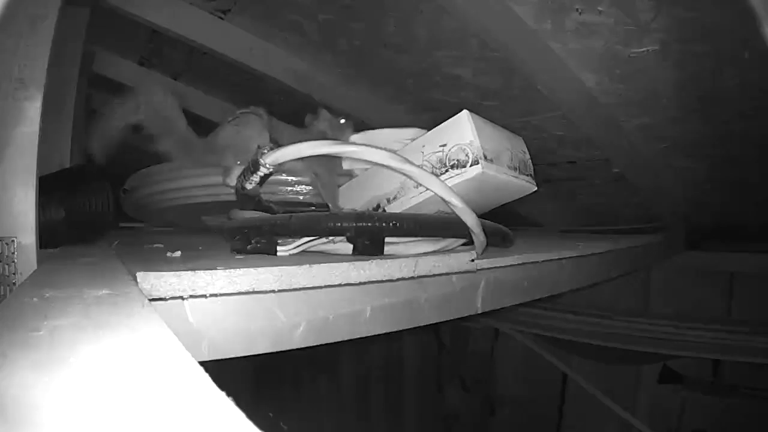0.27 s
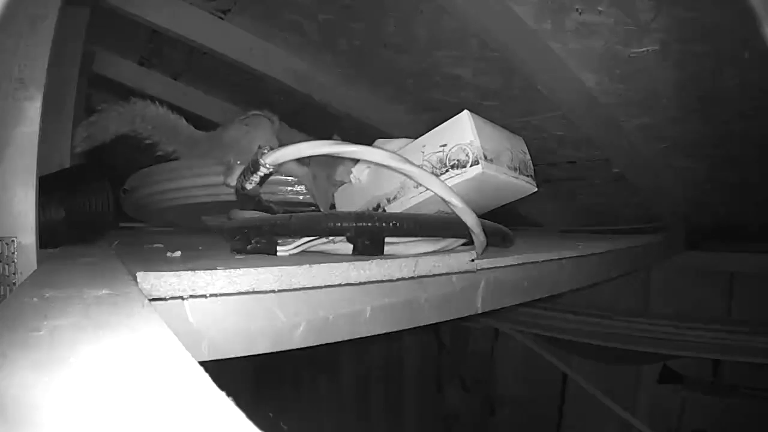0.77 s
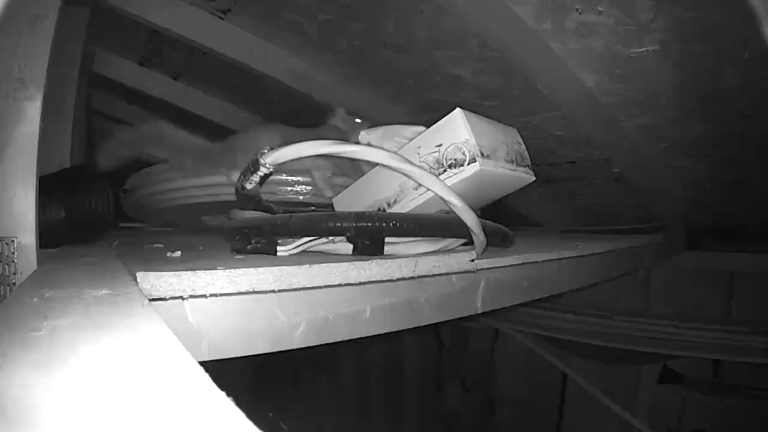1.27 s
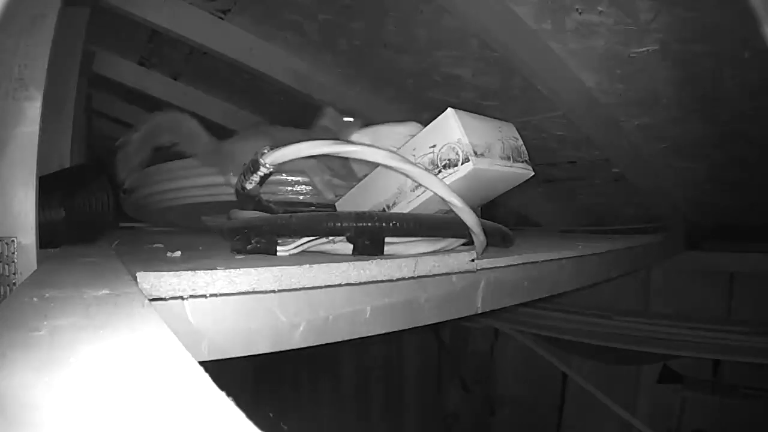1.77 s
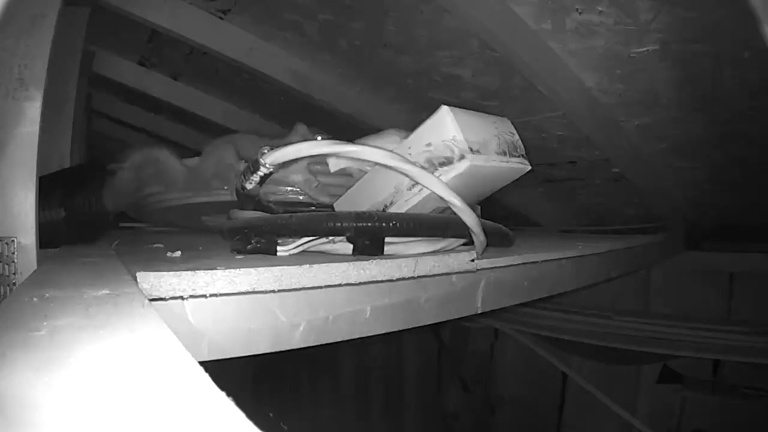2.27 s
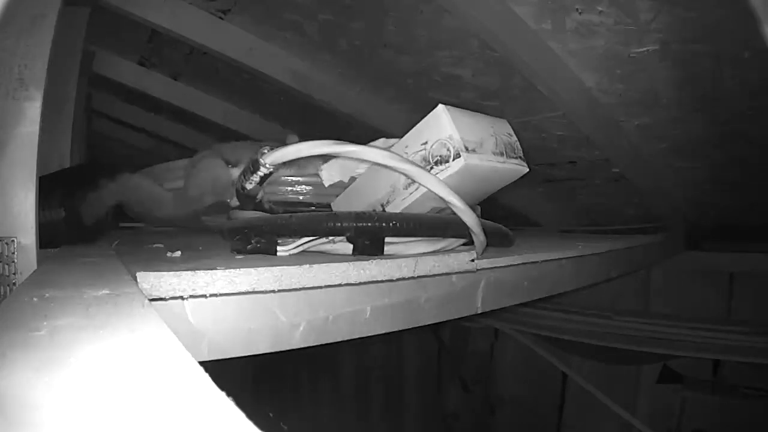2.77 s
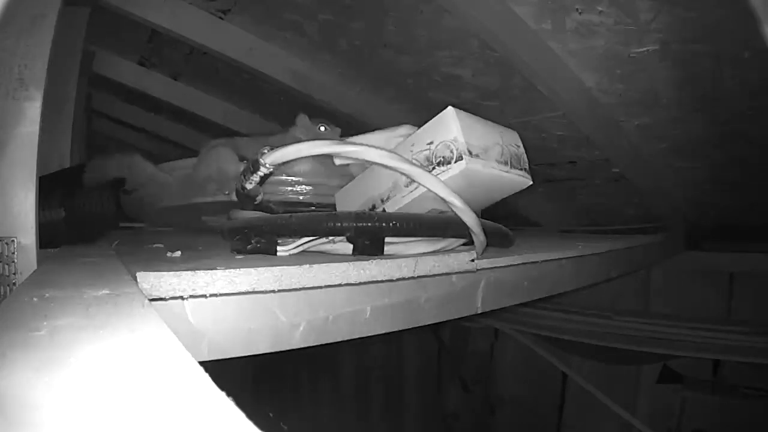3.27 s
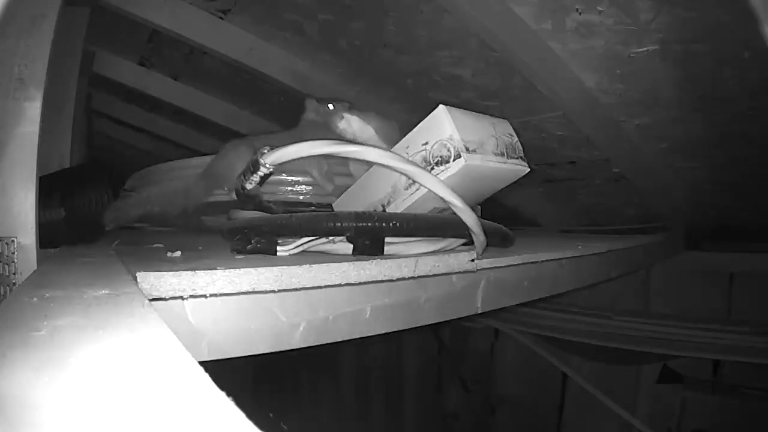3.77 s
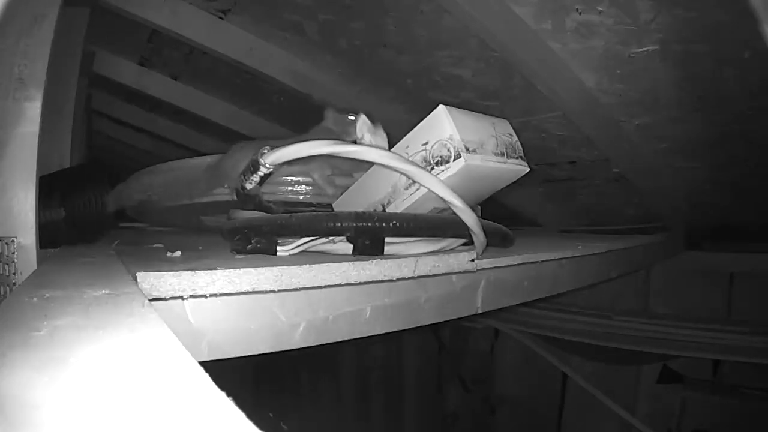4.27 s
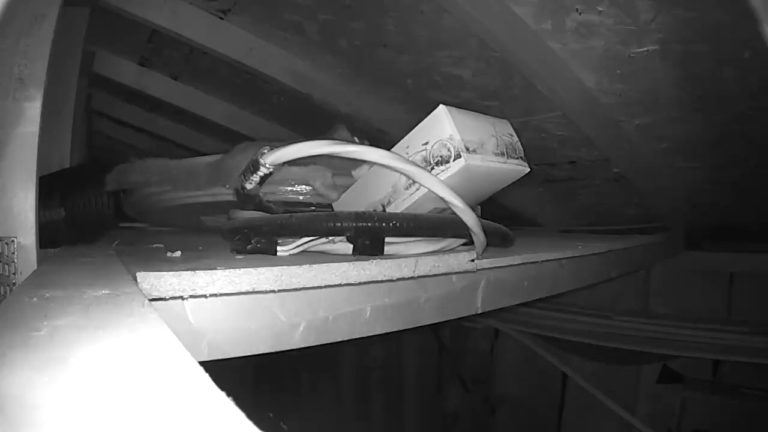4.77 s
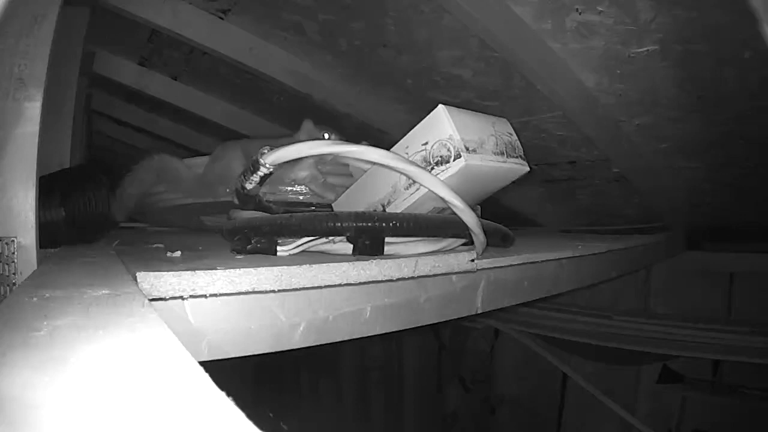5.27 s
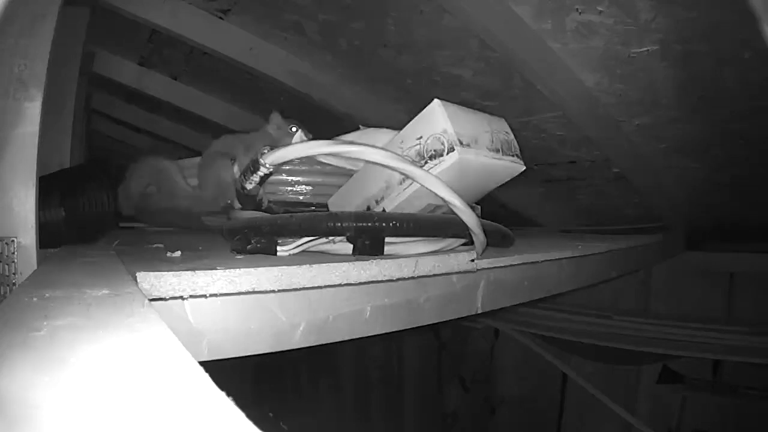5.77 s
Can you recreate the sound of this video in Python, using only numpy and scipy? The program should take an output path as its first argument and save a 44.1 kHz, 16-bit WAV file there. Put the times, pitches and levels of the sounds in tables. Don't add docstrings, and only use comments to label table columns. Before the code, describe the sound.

In a quiet attic, a squirrel-like rodent pulls tissue from a box. A sharp crack comes almost at once, then short crisp rustles, snaps and claw ticks with small pauses. Midway the rasping grows denser and the board knocks; late in the clip come the heaviest wooden thumps. A cheap, dull-topped camera microphone adds low rumble, hiss and a very faint high whine.

```python
import sys
import numpy as np
from scipy import signal
from scipy.fft import rfft, irfft, next_fast_len
from scipy.io import wavfile

SR = 44100
rng = np.random.default_rng(int(sys.argv[2]) if len(sys.argv) > 2 else 0)


def log_audio(samples):
    frames = np.atleast_2d(samples).T
    limited = np.clip(frames, -1, 1)
    pcm = np.round(limited * 32767).astype(np.int16)
    wavfile.write(sys.argv[1], SR, pcm)


def boost(x):
    u = np.asarray(x, float) / 20
    return 10 ** u


N = 265482

# t/s, board creak level/dB, rumble level/dB, board flexing level/dB
LOW_SWELLS = [(.05, -51.5, -60.5, -73), (.54, -68, -64, -62), (0.879, -64, -64.5, -65),
              (1.2, -72, -76, -63.5), (1.56, -53, -69, -62), (2.11, -52, -53.5, -64),
              (2.44, -57, -68, -58), (2.78, -56.5, -59.5, -57), (3.07, -70, -72, -62),
              (3.34, -54, -53, -65), (3.88, -58, -71, -63.5), (4.161, -56, -68.5, -57),
              (4.46, -58, -70, -52), (5.12, -63, -59.5, -57.5), (5.34, -46, -53.5, -50.5),
              (5.46, -55, -63.5, -52.5), (5.82, -53.5, -56, -52.5), (5.95, -50, -59, -51)]
# f/Hz, level per Hz/dB
RUMBLE_SPECTRUM = [(35, -18), (55, -5), (75, -9.5), (105, -4.5), (166, -8), (200, -22.5), (300, -24.5)]
# f/Hz, level per Hz/dB
FLEX_SPECTRUM = [(8, -16), (25, 8.5), (45, -2.5), (70, -32.5)]
# f/Hz, level per Hz/dB
HISS_SPECTRUM = [(120, -14), (160, -8.5), (250, -5), (350, -6.5), (750, -14.5), (1800, -21), (3700, -20),
                 (5500, -21), (6900, -22.5), (7700, -23.5)]
# start t/s, hold t/s, rustle level/dB, box wall share level/dB
TISSUE_TUGS = [(.02, 0.12, -55.5, -0.5), (0.121, 0.11, -52.5, 7), (0.29, 0.12, -58, 0.5),
               (.385, 0.15, -57, -7), (0.71, .04, -60, 0), (0.769, 0.037, -55, 7.5), (0.956, 0.13, -56, -4),
               (1.359, 0.12, -55.5, 4), (1.488, 0.054, -51, 2.5), (1.62, 0.023, -60.5, -2),
               (1.715, 0.037, -54, 3), (1.921, 0.081, -56, 4), (2.078, 0.08, -57, 7.5),
               (2.28, .07, -62, -6), (2.382, 0.046, -52, -2), (2.68, 0.082, -55, 0), (2.98, 0.013, -53, -4),
               (3.261, .03, -53.5, -1.5), (3.353, 0.18, -53.5, -2), (3.559, 0.42, -54, -1.5),
               (3.852, 0.11, -54, 2), (4.124, 0.087, -55, 4.5), (4.19, 0.13, -51, 2.5),
               (4.375, 0.2, -50.5, -3.5), (4.87, 0.068, -53.5, -9), (5.105, 0.038, -59.5, -4),
               (5.195, 0.024, -53, 0), (5.281, 0.1, -50.5, 3), (5.731, 0.15, -50, -5.5),
               (5.933, 0.017, -53.5, 4)]
# start t/s, rustle level/dB
HEAP_STIRS = [
    (2.5, -64),
    (2.835, -59),
    (3.19, -65),
    (4.78, -61),
    (5.02, -65),
    (5.268, -51),
    (5.44, -62.5),
    (5.68, -61),
    (1.87, -65),
]
# f/Hz, level per Hz/dB
TISSUE_SPECTRUM = [(600, -14.5), (900, -19), (1340, -13), (1720, -11.5), (2180, -9), (2800, -8.5),
                   (3200, -8), (3600, -4.5), (4200, -6), (5250, -11), (6300, -11.5), (7000, -17.5),
                   (7700, -14.5)]
# f/Hz, width f/Hz, level/dB
WALL_TONES = [
    (1020, 420, -10),
    (1260, 29, 5.5),
    (1402, 62, 7.5),
    (2060, 190, 3),
]
# f/Hz, width f/Hz, level/dB, extra ring-on level/dB
SNAP_PARTS = [
    (1166, 516, -1, 8),
    (2073, 1160, 2, 4.5),
    (5830, 7700, -1, -0.5),
    (3564, 1680, 0, 3),
]
# t/s, peak level/dB, fold relative level/dB, crisp edge relative level/dB
FOLD_RASPS = [(0.0284, -52, -10, -12), (.3294, -52.5, -11.5, -8), (0.7086, -50, -11, -8),
              (.726, -51, -4, -25), (1.371, -43.5, -6.5, -3), (1.627, -43.5, -15, 2),
              (1.7028, -43, -11.5, -15), (1.7384, -52, -10, -16), (1.952, -48, -11, -14),
              (2.073, -51, -5.5, 2.5), (2.3092, -60, -4, -15), (2.6683, -51.5, -4.5, -21),
              (3.3628, -42.5, -5.5, -4.5), (3.424, -45.5, -8, -23), (3.4865, -39, -8, -17),
              (3.749, -47.5, -3, -2), (3.8686, -43, -5.5, -14), (3.933, -46, -16, -11),
              (3.9766, -56, -3, -8), (4.1245, -45, -17, -18), (4.1924, -41.5, -7.5, -7),
              (4.2594, -52, -10, -20), (4.4147, -39.5, -8.5, -7.5), (4.482, -42, -21, -18),
              (4.55, -48.5, -5, -2), (5.1875, -46.5, -7.5, -6), (5.3027, -38, -3, -11.5),
              (5.3725, -39.5, -6, -16), (5.7454, -55, -3, -13), (5.869, -43, -4.5, -9)]
# t/s, peak level/dB, box wall relative level/dB, time to fall 60 dB t/s
CLAW_SCRAPES = [
    (0.7773, -53, 6, 0.039),
    (1.4334, -52.5, 9.5, 0.076),
    (2.0194, -53.5, -5, 0.08),
    (2.1766, -54.5, -2, 0.082),
    (2.7544, -52.5, 1, 0.067),
    (3.2806, -46.5, -2, 0.095),
    (4.9875, -52.5, -0.5, 0.085),
    (5.2809, -47.5, 1.5, 0.084),
]
# t/s, peak level/dB, hardness per octave above level/dB,
# weight per octave below level/dB, time for contact to fall 60 dB t/s
BOARD_KNOCKS = [(0.116, -35.5, 2, -18.5, 0.011), (0.964, -52.5, 6.5, -4, 0.013),
                (1.43, -44.5, 11.5, -1, 0.026), (1.994, -45, -2, -3.5, 0.047), (2.019, -42, 3, 1, 0.035),
                (2.175, -47, 0, 3, 0.047), (2.377, -52.5, 8, 3.5, 0.025), (2.512, -55, 1, 8.5, 0.028),
                (2.671, -45, 1, -2, 0.032), (2.754, -48, 7.5, 7.5, 0.061), (2.978, -47, 9.5, -6, 0.026),
                (3.28, -32.5, -0.5, -5.5, 0.031), (3.488, -51, 9.5, -4, 0.068), (4.307, -43.5, 3, 5, 0.027),
                (4.473, -53, 4, -6, 0.028), (4.992, -42, -5, -2.5, 0.023), (5.096, -53.5, -6, 0.5, 0.048),
                (5.258, -43.5, 0.5, -2.5, 0.078), (5.302, -30.5, -1, -11, 0.031),
                (5.373, -24.5, -2.5, -2.5, 0.042), (5.757, -45.5, -4, 0, 0.019),
                (5.777, -32.5, -4.5, 1, 0.015), (5.869, -39, -2, 2, 0.019), (5.93, -27, -1.5, -3, 0.04)]
# f/Hz, level/dB, time to fall 60 dB t/s
BOARD_TONES = [(127, -7.5, 0.015), (190, -6.5, 0.051), (223, -8.5, 0.027), (278, -4, .045),
               (365, -7.5, 0.049), (470, -8, 0.024), (480.3, -3, 0.056), (583, -7, 0.041),
               (681, -5.5, 0.025), (856, -9.5, 0.031), (1030, -13, 0.027), (1375, -9, 0.022)]
# t/s, peak level/dB, pitch f/Hz
SHORT_RINGS = [(.1186, -21, 3030), (.1182, -29, 3300), (.7795, -42, 2250), (1.4237, -29.5, 5200),
               (2.878, -42.5, 4700), (2.9743, -43, 1180), (2.975, -44, 690), (4.8648, -44, 2200),
               (5.2512, -29, 4300), (5.378, -39, 210), (5.781, -42, 420), (.9285, -42, 2000),
               (.959, -43, 6200), (5.305, -29, 2600), (5.8005, -37, 4900), (2.755, -49, 1800),
               (1.4235, -43, 8100)]
# t/s, peak level/dB, then relative level/dB of box wall, fold and crisp edge
TISSUE_SNAPS = [(.374, -36.5, -13.5, -12.5, -10), (0.526, -51, -7, -3, -18), (0.9288, -37, -22, -7.5, -13),
                (.9594, -41.5, -27, -2, 5), (1.01, -55, -21, -6, -15), (1.3323, -43, -13, -12, -29),
                (1.4241, -33.5, -13, -33, -42), (1.4903, -39.5, -4.5, -20, -23),
                (2.376, -43.5, -15.5, -4, 3), (2.8804, -51, -22, -20, 0), (2.9739, -41.5, 11.5, -41, -37),
                (4.865, -45.5, -15, -4.5, -15), (5.2525, -39, -22, -24, -31), (5.8022, -37, -20, -14, -22),
                (5.9322, -42.5, 9, 5, -13)]

# level/dB, time to fall 60 dB t/s
SNAP_ECHO, KNOCK_ECHO = (-25, 0.35), (-14, 0.39)


def rms_one(x):
    return x / np.sqrt(np.mean(x ** 2) + 1e-20)


def drift(rate_hz):
    r = np.exp(-2 * np.pi * rate_hz / SR)
    slow = signal.lfilter([1], [1, -2 * r, r * r], rng.standard_normal(N + SR))
    return rms_one(slow[SR:])


def colour(x, spectrum):
    hz, db = np.transpose(spectrum)
    size = next_fast_len(N)
    grid_hz = np.maximum(np.arange(size // 2 + 1) * SR / size, 1)
    gain = boost(np.interp(np.log(grid_hz), np.log(hz), db, -90, -90))
    return rms_one(irfft(rfft(x, size) * gain, size)[:N])


def resonate(x, hz, width_hz):
    r = np.exp(-np.pi * width_hz / SR)
    feed = np.array([1, 0, -1]) * (1 - r * r) / 2
    return signal.lfilter(feed, [1, -2 * r * np.cos(2 * np.pi * hz / SR), r * r], x + 1e-18)


def grains(per_s, spread_db):
    sizes = boost(spread_db * np.minimum(rng.exponential(1, N), 4))
    signed = sizes * rng.choice([-1, 1], N)
    return rms_one(signed * (rng.random(N) < per_s / SR))


def bursts(times, peak_db, t60, rise_share, echo):
    out = np.zeros(N)
    echo_db, echo_t60 = echo
    for s, db, fade in zip(times, peak_db, np.maximum(t60, 0.004)):
        rise = max(rise_share, 0.01) * fade
        start = int((s - 0.0015) * SR)
        t = np.arange(min(SR // 2, N - start)) / SR
        since_peak = np.maximum(t - rise, 0)
        dying = boost(-60 * since_peak / fade) + boost(echo_db - 60 * since_peak / echo_t60)
        out[start:start + len(t)] += boost(db) * dying * np.minimum(t / rise, 1) ** 2
    return out


def cracking(rows, gain_db, rise_share, echo):
    s, peak_db, *shares, t60 = np.transpose(rows)
    cracks, out = grains(16000, spread_db=1.5), 0
    signs = (1, -1, -1, 1)
    for (hz, width, db, ring_db), share_db, sign in zip(SNAP_PARTS, shares + [0], signs):
        part_echo = (echo[0] + ring_db, echo[1])
        struck = cracks * bursts(s, peak_db + share_db + db + gain_db, t60, rise_share, part_echo)
        ringing = resonate(resonate(struck, hz, width), hz, width)
        out = out + sign * ringing * np.sqrt(SR / width) / 3
    return out


def swelling():
    lengths_s = (0.073, 0.059, 0.052)
    at_rest_db = (-68, -62.5, -65.5)
    t = np.arange(0, N, 32) / SR
    s, *peaks = np.transpose(LOW_SWELLS)[:, :, None]
    levels = []
    for db, length, rest_db in zip(peaks, lengths_s, at_rest_db):
        swells = boost(db) * np.exp(-0.5 * ((t - s) / length) ** 2)
        level_db = 20 * np.log10(boost(rest_db) + swells.sum(axis=0))
        levels.append(np.interp(np.arange(N) / SR, t, level_db))
    return levels


def background(rumble_db, flex_db):
    rumble = boost(rumble_db) * colour(rng.standard_normal(N), RUMBLE_SPECTRUM)
    flex = boost(flex_db) * colour(rng.standard_normal(N), FLEX_SPECTRUM)
    hiss = boost(-64.5) * colour(rng.standard_normal(N), HISS_SPECTRUM)
    whine = boost(-78) * rms_one(resonate(rng.standard_normal(N), hz=6675, width_hz=14))
    return rumble + flex + hiss + whine


def tugging():
    grip_db_per_s, sag_db_per_s, let_go_db_per_s = 451, 9.5, 195
    settle_db, settle_wall_db = -80, 1.5
    stir_hold_s, stir_wall_db = 0.051, -3
    t = np.arange(0, N, 32) / SR
    stirs = [(s, stir_hold_s, db, stir_wall_db) for s, db in HEAP_STIRS]
    s, hold, db, wall_db = np.transpose(list(TISSUE_TUGS) + stirs)[:, :, None]
    since = t - s
    grip = grip_db_per_s * np.minimum(since, 0)
    sag = sag_db_per_s * np.clip(since, 0, hold)
    let_go = let_go_db_per_s * np.maximum(since - hold, 0)
    pull = boost(db + grip - sag - let_go) ** 2
    still = boost(settle_db) ** 2
    power = still + pull.sum(axis=0)
    level_db = 10 * np.log10(power)
    share_db = (still * settle_wall_db + (pull * wall_db).sum(axis=0)) / power
    crisp_db = 2 + 0.52 * np.maximum(-63.5 - level_db, 0)
    return [np.interp(np.arange(N) / SR, t, curve) for curve in (level_db, share_db, crisp_db)]


def rustle(level_db, wall_db, crisp_db):
    clumps = boost(1.2 * drift(25) + 1.2 * drift(70))
    tissue = colour(clumps * grains(4000, spread_db=0.5), TISSUE_SPECTRUM)
    edge = signal.sosfilt(signal.butter(4, 4900, "high", fs=SR, output="sos"), tissue)
    tissue = tissue + (boost(crisp_db) - 1) * edge
    rubbing = clumps * grains(3000, spread_db=10.5)
    wall = rms_one(sum(boost(db) * resonate(rubbing, hz, width) for hz, width, db in WALL_TONES))
    return boost(level_db - 1.5) * (tissue + boost(wall_db - 11.0) * wall)


def rasps():
    rows = []
    for s, db, fold_db, edge_db in FOLD_RASPS:
        wall_db = fold_db - 2
        rows.append((s, db, wall_db, fold_db, edge_db, 0.077))
    for s, db, wall_db, t60 in CLAW_SCRAPES:
        rows.append((s, db, wall_db, -3.5, -15.5, t60))
    return cracking(rows, gain_db=0.5, rise_share=0.083, echo=SNAP_ECHO)


def board(creak_db):
    s, peak_db, hard_db, weight_db, t60 = np.transpose(BOARD_KNOCKS)
    out = 0
    for hz, db, ring_s in BOARD_TONES:
        octaves = np.log2(hz / 480)
        strength_db = peak_db + (hard_db if octaves > 0 else -weight_db) * octaves
        knocks = bursts(s, strength_db, t60, rise_share=0.061, echo=KNOCK_ECHO)
        push = (knocks + boost(creak_db - 9.5)) * rng.standard_normal(N)
        r, w = boost(-60 / (ring_s * SR)), 2 * np.pi * hz / SR
        feed = [0, boost(db - 26.0) * np.sin(w)]
        out = out + signal.lfilter(feed, [1, -2 * r * np.cos(w), r * r], push)
    return out


def box_edge():
    # t/s, peak level/dB, relative level/dB of wall, fold and crisp edge, time to fall 60 dB t/s
    crack = (0.1168, -17.5, -7, -14, -19, 0.012)
    return cracking([crack], gain_db=4.5, rise_share=0.236, echo=(-23, 0.35))


def flicks():
    ring_cycles = 21
    touches = ((0, 0), (0.0021, -3.5))
    out, t = np.zeros(N), np.arange(SR // 8) / SR
    for s, db, hz in SHORT_RINGS:
        ring = np.sin(2 * np.pi * hz * t) * boost(db - 60 * t * hz / ring_cycles)
        for lag, loss_db in touches:
            start = int((s + lag) * SR)
            out[start:start + len(t)] += boost(loss_db) * ring
    return out


def snaps():
    rows = [(*row, 0.035) for row in TISSUE_SNAPS]
    return cracking(rows, gain_db=2.0, rise_share=0.025, echo=SNAP_ECHO)


def scene():
    creak_db, rumble_db, flex_db = swelling()
    attic = background(rumble_db, flex_db)
    tissue = rustle(*tugging()) + rasps() + snaps()
    hard_parts = board(creak_db) + box_edge() + flicks()
    return (attic + tissue + hard_parts)[None]


def roll_off(x):
    return signal.sosfilt(signal.butter(12, 7820, fs=SR, output="sos"), x)


def record(dry):
    low_pass = signal.cheby2(13, 40, 7670, fs=SR, output="sos")
    mix = signal.sosfilt(low_pass, dry) + 0.0012
    return roll_off(mix)


dry = scene()
out = record(dry)
log_audio(out)
```